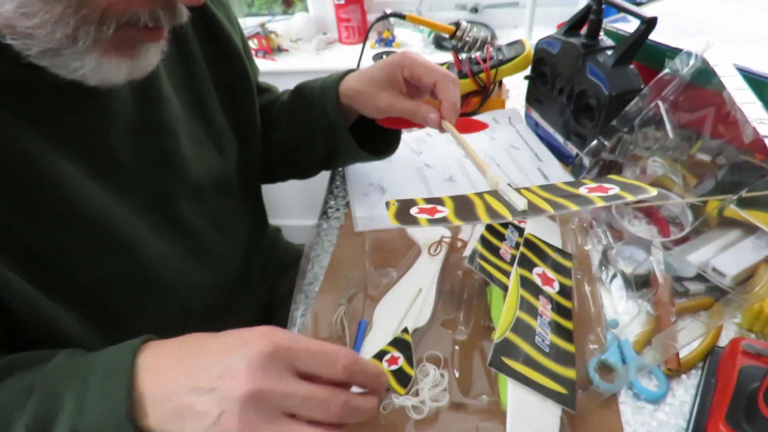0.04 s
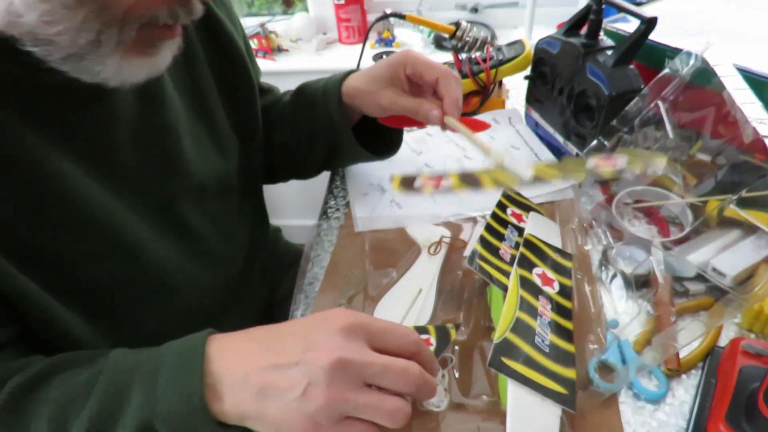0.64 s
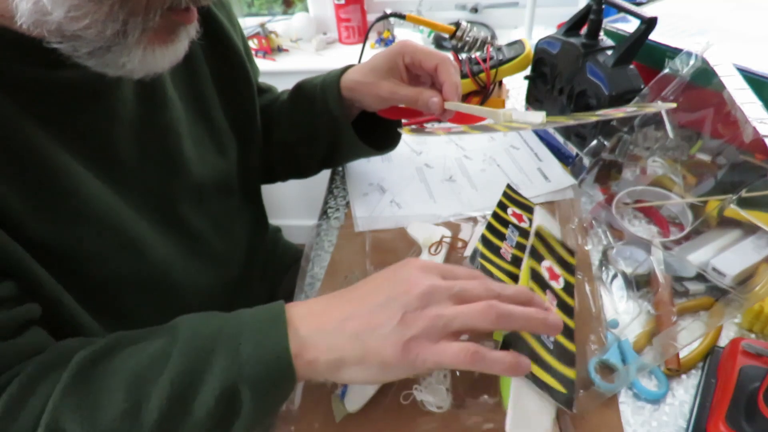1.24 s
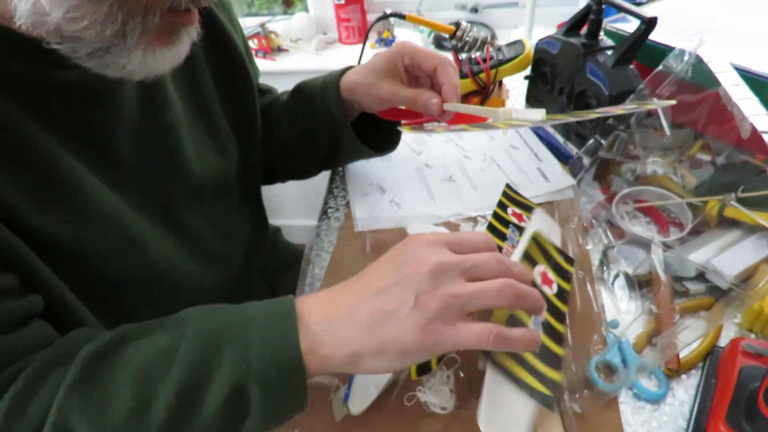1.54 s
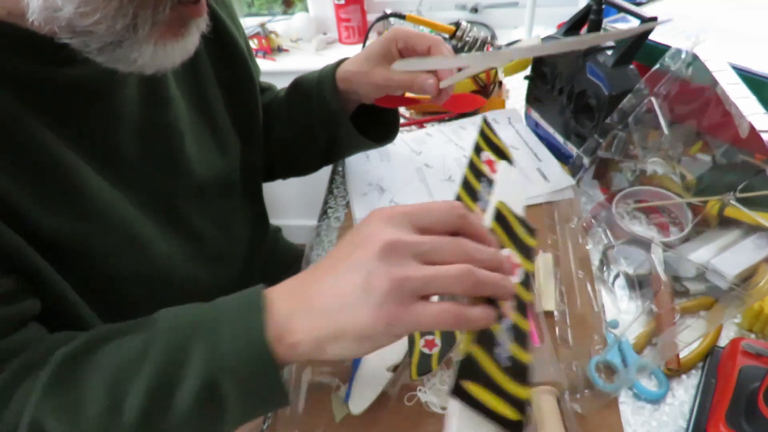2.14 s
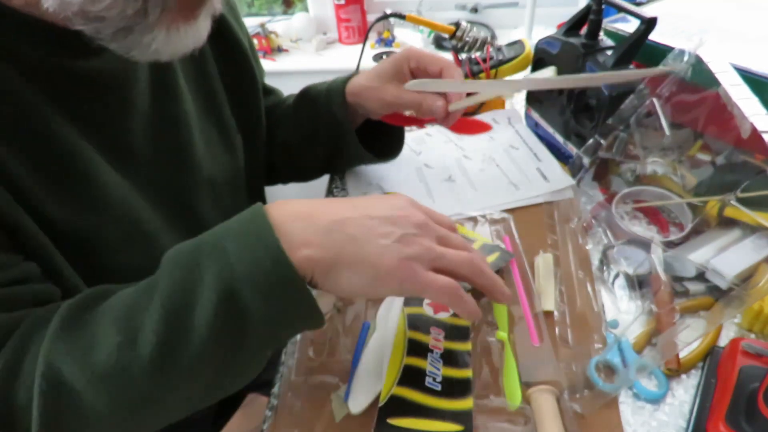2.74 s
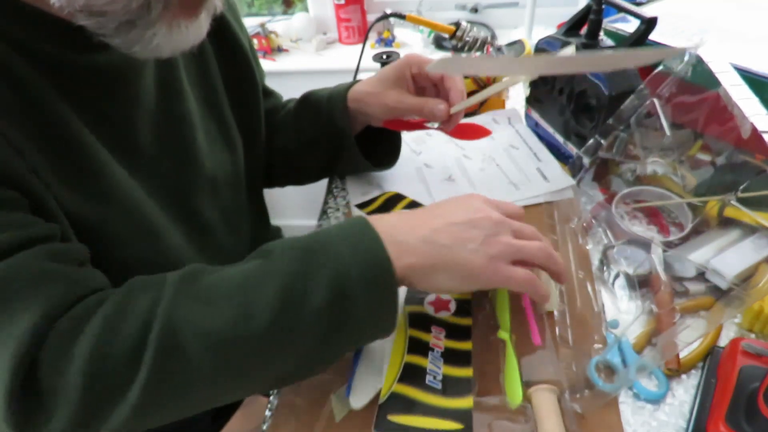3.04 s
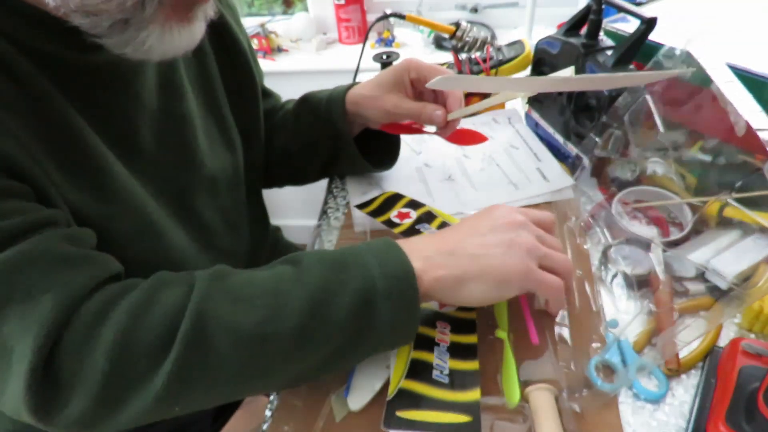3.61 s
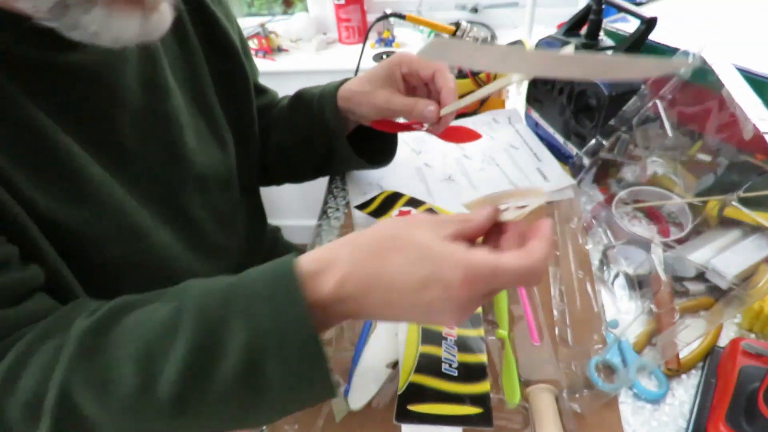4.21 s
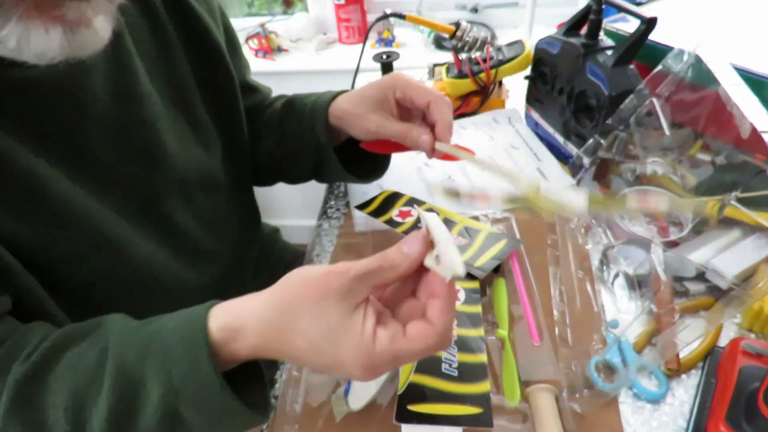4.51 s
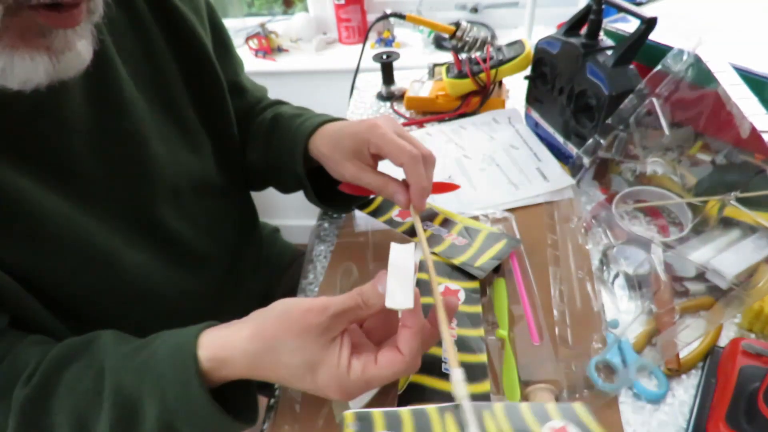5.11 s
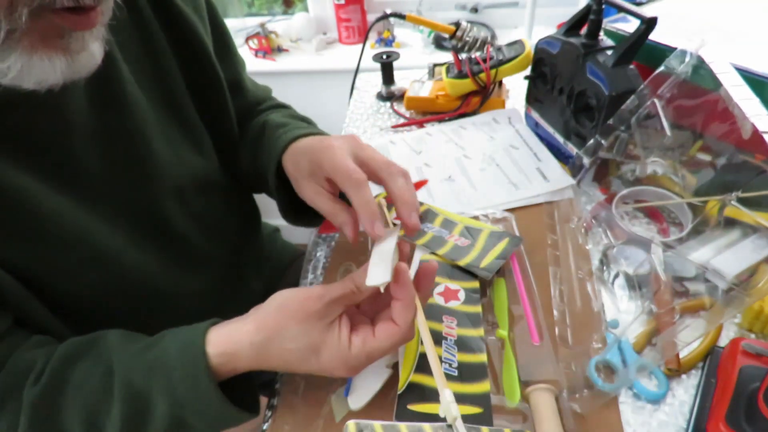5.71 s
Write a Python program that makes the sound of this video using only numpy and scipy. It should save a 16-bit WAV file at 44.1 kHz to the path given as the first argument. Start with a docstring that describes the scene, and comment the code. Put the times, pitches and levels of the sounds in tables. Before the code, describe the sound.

Hands pick paper and plastic model parts out of a thin plastic tray, with scattered taps, crackly rattles and soft rustling.

```python
"""A workbench in a small room: hands pick paper and plastic kit parts out of a thin plastic tray.
Parts tap, rattle and scuff: single clicks and stick-slip trains ring the part and the tray,
and the room answers with echoes that change as the hand moves. Between the contacts fingers and
sleeves rustle and the plastic crinkles, over a quiet room hum and a faint tone that comes in blips."""
import sys
import numpy as np
from scipy import signal
from scipy.fft import rfft, irfft
from scipy.io import wavfile
from scipy.ndimage import uniform_filter1d

SR = 44100
rng = np.random.default_rng(int(sys.argv[2]) if len(sys.argv) > 2 else 0)


def generate_wav(signal):
    """Clip the signal to [-1, 1] and save it as 16-bit WAV at the path in sys.argv[1]."""
    frames = np.transpose(np.atleast_2d(signal))
    scaled = np.clip(frames, -1, 1) * 32767
    pcm = np.round(scaled).astype(np.int16)
    wavfile.write(sys.argv[1], SR, pcm)


N = 254016
T = np.arange(N) / SR
FILTER_SIZE = 8192
FILTER_HZ, SCENE_HZ = np.fft.rfftfreq(FILTER_SIZE, 1 / SR), np.fft.rfftfreq(N, 1 / SR)
# resonances of a stiff paper wing: f/Hz, width/Hz, gain/dB
WING_MODES = [(720, 290, -5), (1100, 120, 8.5), (1565, 160, 13.5), (1900, 100, 9), (2080, 70, 0.5),
              (2710, 270, 8.5), (3870, 140, 0), (4280, 180, 0)]


def amp(db):
    return 10 ** (np.asarray(db) / 20)


def unit_rms(x):
    return x / np.sqrt(np.mean(x ** 2) + 1e-30)


def curve(points, hz):
    """Linear interpolation over log frequency."""
    f, value = np.transpose(points)
    return np.interp(np.log(hz + 1), np.log(f), value)


def add(mix, start_s, sound):
    part = mix[max(round(start_s * SR), 0):][:len(sound)]
    part += sound[:len(part)]


def bell(hz, width_hz):
    """Resonance curve, 1 at its centre."""
    return 1 / (1 + (2 * (FILTER_HZ - hz) / width_hz) ** 2)


def swell(start_s, length_s, rise_s, fall_s):
    """Linear rise, hold, exponential fall."""
    return np.clip((T - start_s) / rise_s, 0, 1) * np.exp(-np.maximum(T - start_s - length_s, 0) / fall_s)


def minimum_phase(gain):
    """Most compact impulse response of this spectral shape, peak 1."""
    phase = -signal.hilbert(np.log(np.r_[gain, gain[-2:0:-1]] + 1e-6)).imag[:len(gain)]
    pulse = irfft(gain * np.exp(1j * phase))[:FILTER_SIZE // 2]
    return pulse / abs(pulse).max()


def diffuse(pair, coherence, gain=1):
    """Two independent signals become a stereo field from all around."""
    alike = np.clip(curve(coherence, np.fft.rfftfreq(pair.shape[1], 1 / SR)), -1, 1)
    mid, side = rfft(pair) * gain * np.sqrt([1 + alike, 1 - alike])
    return irfft([mid + side, mid - side], pair.shape[1])


def wide_noise(gain):
    """Shaped stereo noise, rms 1."""
    # left-right likeness: f/Hz, coherence
    coherence = [(50, 0.95), (120, 0.83), (240, -0.081), (450, -0.33), (750, -0.37), (1200, 0.31),
                 (2500, -0.088), (10000, -0.029)]
    return unit_rms(diffuse(rng.standard_normal((2, N)), coherence, gain))


def room_tone(air_db=-64.6):
    """Room air and narrow noise bands of hum."""
    # air spectrum: f/Hz, relative level/dB
    air_shape = [(15, -72), (25, -16), (43, -22), (79, -24), (150, -9), (270, -6), (309, -6), (344, -7),
                 (415, -4), (689, -3), (788, -10), (1580, -16.5), (2300, -22), (11700, -40), (14900, -63)]
    # hum: f/Hz, width/Hz, level/dB
    hum_bands = [(58.76, 1, -85), (101, 18, -83), (151.1, 13.6, -81.5), (617, 6.4, -73), (678.5, 33, -74),
                 (831, 36, -78.5), (1031, 48, -77.5)]
    hum = sum(amp(db) * wide_noise(1 / (1 + (2 * (SCENE_HZ - hz) / width_hz) ** 4))
              for hz, width_hz, db in hum_bands)
    return amp(air_db) * wide_noise(amp(curve(air_shape, SCENE_HZ))) + hum


def blips(tone_hz=415.3, half_width_s=0.012, pitch_spread=0.058):
    """A faint tone in Gaussian blips, each slightly detuned."""
    # blip peaks: t/s, level/dB
    peaks = [(0.391, -62.5), (.43, -63), (0.521, -63), (0.559, -64), (.591, -62), (.657, -61), (0.701, -67),
             (.792, -59), (3.624, -60), (3.919, -55.5), (3.99, -62), (4.055, -57), (4.118, -58),
             (4.324, -61), (4.352, -56), (4.424, -58), (4.456, -61.5), (4.487, -60.5), (4.528, -61.5),
             (4.56, -58.5), (4.732, -62), (4.76, -58.5), (4.827, -59)]
    out, t = np.zeros(N), np.arange(-SR // 20, SR // 20) / SR
    for (at_s, db), (detune, phase) in zip(peaks, rng.uniform(-1.07, 1, (len(peaks), 2))):
        tone = np.sin(2 * np.pi * tone_hz * (1 + pitch_spread * detune) * t + np.pi * phase)
        add(out, at_s + t[0], amp(db) * np.exp(-(t / half_width_s) ** 2) * tone)
    return out


def rubbing(rest_db=-76.5, rest_paper=0.26):
    """Cloth and paper gains over time; the hands are never quite still."""
    # hand strokes: start/s, length/s, level/dB, paper share of the power
    strokes = [(0.3, 0.085, -67, 0.4), (1.301, 0.28, -67, 0.44), (2.326, 0.49, -63.5, 0),
               (2.748, 0.58, -70.5, 0), (4.28, 0.69, -70.5, 0), (4.86, 0.24, -69, 0.3),
               (5.308, 0.36, -70, 1)]
    shares = lambda paper: np.array([[1 - paper], [paper]])
    power = sum(shares(paper) * (amp(db) * swell(start_s, length_s, rise_s=0.014, fall_s=0.055)) ** 2
                for start_s, length_s, db, paper in strokes)
    return np.sqrt(power + shares(rest_paper) * amp(rest_db) ** 2)


def rustle(grain_db=2.0):
    """Sleeves and paper rub softly and unevenly."""
    # cloth friction spectrum: f/Hz, relative level/dB
    cloth = [(60, -19), (160, -8), (300, -5), (650, 0.5), (1100, -5), (2300, -12.5), (7000, -28),
             (11500, -33), (13500, -44)]
    # paper friction spectrum: f/Hz, relative level/dB
    paper = [(200, -19), (700, 9.5), (1150, 2), (1650, -1.5), (2000, -13), (3500, -10.5), (4400, -10),
             (5500, -23), (11500, -42), (13500, -44)]
    surfaces = np.array([wide_noise(amp(curve(shape, SCENE_HZ))) for shape in (cloth, paper)])
    grain = unit_rms(uniform_filter1d(rng.standard_normal(N), size=900))
    return (rubbing()[:, None] * surfaces).sum(0) * unit_rms(amp(grain_db * grain))


def room(x, build_s=0.0089, shade_hz=4500, shade=0.34):
    """Direct sound, near reflections and a diffuse tail that lasts longest in the bass."""
    # tail: f/Hz, t60/s, level/dB; thin plastic throws its treble in all directions
    tail_bands = [(150, 0.64, 1.5), (525, 0.31, 3.5), (960, 0.36, 0.5), (1390, 0.43, -3.5),
                  (3300, 0.35, -2), (6700, 0.34, 1.5), (12000, 0.23, 3)]
    # left-right likeness of the tail: f/Hz, coherence
    coherence = [(50, 0.95), (130, 1), (250, 0.89), (450, 0.69), (700, 0.89), (1400, 0.85), (2600, 0.73),
                 (5000, 0.44), (9000, 0.054)]
    # reflections off bench, clutter and body: delay/s, left gain, right gain
    echoes = [(.0011, 0.43, 0.17), (.0024, -0.32, -0.16), (.0043, 0.14, 0.12), (.0068, 0.25, 0.34),
              (.0093, -.14, -.2), (0.0109, 0.079, 0.055)]
    bands = np.array(tail_bands)
    field = diffuse(rng.standard_normal((2, SR * 3 // 4)), coherence)
    hz, t, spectra = signal.stft(field, SR, nperseg=256)
    t60_s, wet_db = curve(bands[:, :2], hz)[:, None], curve(bands[:, ::2], hz)[:, None]
    fade = np.exp(-np.log(1000) * t / t60_s) * np.sqrt(np.log(1000) / (t60_s * SR))  # energy 1 per band
    tail = signal.istft(spectra * fade * amp(wet_db), SR, nperseg=256)[1]
    tail *= 1 - np.exp(-(np.arange(tail.shape[1]) / SR / build_s) ** 2)
    near = np.zeros_like(tail)
    near[:, 0] = 1
    for delay_s, left, right in echoes:
        near[:, round(delay_s * SR * rng.uniform(.85, 1.15))] += left, right
    dull = signal.lfilter(*signal.butter(1, shade_hz, fs=SR), near)  # the hand shades the near paths
    return signal.fftconvolve(x[None], tail + near + shade * (dull - near), axes=1)[:, :N]


def wander(x, places=3, moves_per_s=5):
    """The hand cycles through a few places, each with its own echoes."""
    position = T * moves_per_s % places
    out = np.zeros((2, N))
    for place in range(places):
        distance = abs((position - place + places / 2) % places - places / 2)
        crossfade = np.sin(np.pi / 2 * np.clip(2.5 - 4 * distance, 0, 1)) ** 2
        out += room(x * crossfade)
    return out


def slips(samples, per_s, spread_db):
    """Random train of stick-slip clicks, sized from 0 dB to spread_db."""
    chance, size, sign = rng.random((3, samples))
    return (chance < per_s / SR) * amp(spread_db * size) * np.sign(sign - .5)


def tray_response(modes, thump_db, edge_hz, crackle_db, top_hz, ring_hz, ring_width_hz, ring_db):
    """Part and tray answer one click: a soft contact cuts treble, a heavy one adds bass."""
    # broad spectrum of tray and parts: f/Hz, relative level/dB
    body_shape = [(40, -52), (90, -25), (160, -23), (330, -11.5), (520, -8), (700, -0.5), (1000, -1.5),
                  (1400, 0.5), (2000, -2), (3000, -9), (5000, -7), (15000, -14)]
    # fine crackle of thin plastic: f/Hz, relative level/dB
    crackle_shape = [(100, -31), (1500, 14), (3500, 4.5), (5200, 0.5), (7000, -4.5), (10000, -7.5),
                     (12500, -10), (14500, -21)]
    modes_db = sum(db * bell(hz, width_hz) for hz, width_hz, db in modes)
    part_db = thump_db * bell(hz=400, width_hz=330) + ring_db * bell(ring_hz, ring_width_hz)
    body = amp(curve(body_shape, FILTER_HZ) + part_db) / np.sqrt(1 + (FILTER_HZ / edge_hz) ** 14)
    crackle = amp(crackle_db + curve(crackle_shape, FILTER_HZ)) / np.sqrt(1 + (FILTER_HZ / top_hz) ** 10)
    return minimum_phase(np.hypot(body, crackle) * amp(modes_db))


def contact(kind, crackle_cut_db=0):
    """One click of this kind rings the paper wing, a hollow part or the tray."""
    # contact timbres: thump/dB, treble edge/Hz, crackle/dB, crackle top/Hz,
    # ring/Hz, ring width/Hz, ring/dB, kind
    timbres = [(14, 3500, -16, 16000, 1490, 130, 18, "tick"),
               (1, 4130, -26.5, 20000, 1900, 1200, -2.5, "sheet"),
               (-5, 2600, -12, 15000, 1840, 1060, 11.5, "clack"),
               (5, 3700, -20.5, 22000, 3500, 760, 6, "crack"),
               (5, 4000, -14.5, 20000, 3050, 760, 10.5, "burst"),
               (-7, 2980, -33, 37000, 880, 120, 2, "snap"),
               (-10, 3200, -25.5, 10400, 1600, 710, 5, "flick"),
               (-1, 4900, -3, 9800, 1126, 180, 16.5, "crinkle"),
               (17, 3300, 5, 20000, 9000, 5000, 16, "fizz"),
               (6.5, 3400, -19.5, 25000, 340, 90, 4.5, "crunch"),
               (7, 3200, -19, 14000, 1070, 330, 11.5, "knock"),
               (-10, 3450, -24.5, 10000, 940, 100, 4.5, "buckle"),
               (-0.5, 3200, -28, 12500, 1160, 390, 9.5, "hollow"),
               (-3, 604, -38, 7500, 185, 170, 14, "thud"), (10.5, 1480, -21.5, 12000, 867, 200, 14, "pat"),
               (4, 2900, -36, 12000, 900, 270, 6.5, "bump"),
               (-15, 5100, -10, 16000, 4500, 2500, -4, "click"),
               (-10, 5400, -17, 20000, 4500, 650, 13, "scratch"),
               (-6, 4100, -20, 20000, 3570, 1300, 19.5, "rasp")]
    # tray resonances and dips: f/Hz, width/Hz, gain/dB
    tray_modes = [(662, 36, 4), (776, 39, 4), (792, 59, 4.5), (945.4, 40, 2.5), (1100, 25, 4),
                  (1285, 81, 3), (1720, 33, 0.5), (1880, 20, -7), (2610, 50, 2.5), (3610, 66, -8)]
    # resonances of a hollow plastic part: f/Hz, width/Hz, gain/dB
    shell_modes = [(802, 150, 7.5), (1130, 470, -10), (1510, 180, 7), (2060, 360, 5), (4770, 300, 7)]
    part_modes = {"sheet": WING_MODES, "rasp": WING_MODES, "scratch": WING_MODES, "clack": shell_modes}
    modes = part_modes.get(kind, tray_modes)
    thump_db, edge_hz, crackle_db, *rest = next(timbre for *timbre, name in timbres if name == kind)
    return tray_response(modes, thump_db, edge_hz, crackle_db - crackle_cut_db, *rest)


def crinkles(over_rubbing_db=1):
    """Thin plastic ticks at random, louder while the hands move."""
    clicks = slips(N, per_s=10, spread_db=0) * np.hypot(*rubbing())
    return amp(over_rubbing_db) * signal.oaconvolve(clicks, contact("crinkle"))[:N]


def wing_slide():
    """The wing's stick slides between the fingers; dense slips set the wing ringing."""
    # slides: start/s, length/s, level/dB
    slides = [(5.353, 0.32, -78.5)]
    pressure = sum(amp(db) * swell(start_s, length_s, rise_s=0.026, fall_s=0.091)
                   for start_s, length_s, db in slides)
    wing = tray_response(WING_MODES, thump_db=-7, edge_hz=1750, crackle_db=-35, top_hz=16000,
                         ring_hz=1250, ring_width_hz=250, ring_db=1)
    return pressure * unit_rms(signal.oaconvolve(slips(N, per_s=2200, spread_db=-3), wing)[:N])


def scuffs():
    """Dense slips swell and die as an edge drags over the tray."""
    # drags: peak t/s, level/dB, rise/s, fall/s, contact kind
    drags = [(1.376, -78, 0.019, .026, "rasp"), (1.494, -78, 0.011, .04, "rasp"),
             (1.597, -50.5, 0.0099, 0.0088, "sheet"), (1.604, -44, 0.0053, 0.0084, "sheet"),
             (1.625, -46.5, .0057, 0.0029, "sheet"), (1.698, -58.5, .012, .007, "sheet"),
             (1.712, -70, 0.023, 0.011, "scratch"), (2.385, -64, .074, 0.02, "pat"),
             (2.629, -59, 0.0041, 0.031, "fizz"), (2.689, -38, .003, 0.0092, "clack"),
             (2.958, -55, 0.0097, .008, "fizz"), (2.982, -58.5, 0.027, 0.0056, "fizz"),
             (3.027, -39, 0.014, 0.005, "crinkle"), (3.452, -42, 0.016, .015, "crunch"),
             (3.498, -29.5, 0.0094, 0.0059, "burst"), (3.793, -49.5, 0.012, 0.0034, "crunch"),
             (4.181, -36.5, 0.016, 0.0026, "knock"), (4.18, -47, 0.025, 0.016, "thud"),
             (4.666, -70.5, 0.011, .008, "burst"), (4.792, -64, 0.0033, 0.012, "tick"),
             (4.944, -60, 0.0055, 0.015, "hollow")]
    out, t = np.zeros(N), np.arange(-SR // 2, SR // 2) / SR
    for peak_s, db, rise_s, fall_s, kind in drags:
        pressure = np.exp(-abs(t / np.where(t < 0, rise_s, fall_s)))
        drag = signal.fftconvolve(slips(len(t), per_s=3000, spread_db=3.5) * pressure, contact(kind))
        add(out, peak_s + t[0], amp(db) * drag * np.linalg.norm(pressure) / np.linalg.norm(drag))
    return out


def taps(rattle_db=5.5, reference_decay_s=0.009):
    """A part strikes the tray: one sharp knock, then a dying rattle of crackling plastic."""
    # blows: t/s, level/dB, rattle decay/s, contact kind
    blows = [(.3372, -48.5, 0.0037, "tick"), (.341, -52.5, 0.0014, "tick"), (.378, -53.5, 0.0033, "tick"),
             (.3935, -58, 0.0013, "hollow"), (.4, -49, 0.0015, "tick"), (1.352, -61.5, .001, "rasp"),
             (1.367, -63, .002, "rasp"), (1.380, -50.5, 0.0043, "bump"), (1.429, -49.5, 0.0011, "knock"),
             (1.437, -55, .0015, "knock"), (1.468, -57, .001, "rasp"), (1.487, -57, 0.0027, "rasp"),
             (1.518, -51.5, 0.0016, "knock"), (1.554, -59, .001, "rasp"), (1.601, -39.5, 0.0033, "sheet"),
             (1.618, -47, 0.00092, "sheet"), (2.2762, -36.5, .014, "crack"), (2.2845, -38, .002, "crack"),
             (2.350, -53, .0059, "pat"), (2.3655, -42, 0.0044, "bump"), (2.382, -55, 0.0031, "hollow"),
             (2.401, -41.5, 0.0014, "pat"), (2.554, -55, 0.0086, "rasp"), (2.6165, -38, 0.02, "flick"),
             (2.644, -38, 0.0053, "snap"), (2.680, -28, 0.0052, "crack"), (2.6865, -31, .002, "crack"),
             (2.698, -18.5, 0.00092, "clack"), (2.705, -29, 0.0013, "clack"),
             (2.725, -33, 0.0087, "crunch"), (2.737, -41, .003, "crack"), (2.939, -51, 0.0095, "pat"),
             (2.954, -45.5, 0.0054, "knock"), (2.998, -27, 0.0027, "snap"), (3.0045, -30, 0.0031, "flick"),
             (3.032, -28, 0.0019, "buckle"), (3.268, -49.5, .001, "knock"),
             (3.427, -22.5, 0.0068, "crunch"), (3.440, -23, 0.0097, "crunch"),
             (3.454, -27.5, 0.0047, "crack"), (3.4605, -37, .002, "snap"),
             (3.472, -21.5, 0.00086, "crunch"), (3.480, -30, 0.0025, "knock"),
             (3.4925, -24, 0.0011, "crack"), (3.497, -20.5, 0.00087, "burst"),
             (3.502, -17.5, 0.0022, "crack"), (3.5055, -25, 0.0028, "burst"), (3.5125, -27, 0.0045, "snap"),
             (3.521, -26, 0.0014, "snap"), (3.783, -26, .003, "snap"), (3.7895, -32.5, 0.0017, "crack"),
             (3.7955, -28.5, 0.0025, "snap"), (3.8025, -32.5, 0.0018, "flick"),
             (3.8503, -30, 0.0025, "bump"), (3.859, -35, 0.0014, "hollow"), (4.132, -33, 0.0055, "bump"),
             (4.1473, -24, 0.0054, "flick"), (4.158, -27, 0.0012, "hollow"),
             (4.166, -28.5, 0.0029, "hollow"), (4.178, -25.5, 0.0013, "buckle"),
             (4.185, -20.5, 0.0016, "buckle"), (4.1905, -26, .001, "buckle"),
             (4.214, -36.5, .002, "hollow"), (4.262, -42, 0.0043, "pat"), (4.2974, -36, 0.0036, "hollow"),
             (4.3065, -40, 0.0012, "bump"), (4.311, -36.5, 0.0012, "hollow"),
             (4.598, -50.5, 0.00097, "click"), (4.606, -54, .001, "click"), (4.664, -54, .001, "crinkle"),
             (4.671, -56, 0.0012, "click"), (4.7863, -55, .002, "click"), (4.931, -54, .002, "knock"),
             (4.9755, -51.5, 0.0019, "knock")]
    out, t = np.zeros(N), np.arange(SR // 8) / SR
    for at_s, db, decay_s, kind in blows:
        decay_s = max(decay_s, 0.001)
        knock = contact(kind, crackle_cut_db=12)
        clicks = slips(len(t), per_s=1900, spread_db=25) * np.exp(-t / decay_s) * (t > .0008)
        rattle = signal.fftconvolve(clicks, contact(kind))
        # rattle energy: rattle_db above the knock at the reference decay, more if longer
        size = amp(rattle_db) * np.sqrt(decay_s / reference_decay_s) * np.linalg.norm(knock)
        add(out, at_s, amp(db) * knock)
        add(out, at_s, amp(db) * size * rattle / (np.linalg.norm(rattle) + 1e-9))
    return out


def scene(parts_left_db=0.6):
    """Parts almost straight ahead; the background leans left in the low mids."""
    # background balance: f/Hz, left over right/dB
    balance = [(260, -0.5), (420, 4), (700, 2.5), (1200, -1.5), (3000, -0.1)]
    sides = np.array([[.5], [-.5]])
    parts = wander(taps() + scuffs() + wing_slide() + crinkles()) * amp(parts_left_db * sides)
    background = rustle() + room_tone() + blips()
    lean = amp(curve(balance, SCENE_HZ) * sides)
    return parts + irfft(rfft(background) * lean, N)


def record(dry, cutoff_hz=14600):
    """Steep low-pass on the top treble."""
    lowpass = signal.firwin(255, cutoff_hz, window=("kaiser", 8), fs=SR)
    return signal.oaconvolve(dry, lowpass[None], "same")


dry = scene()
out = record(dry)
generate_wav(out)
```